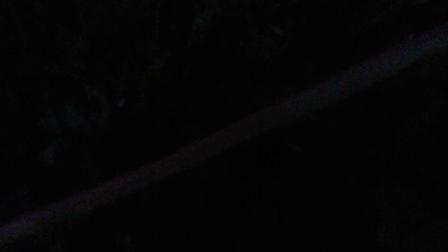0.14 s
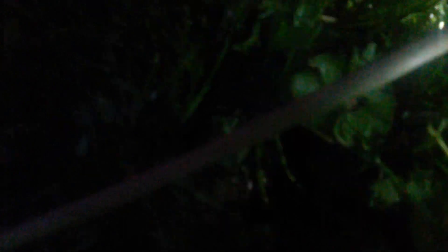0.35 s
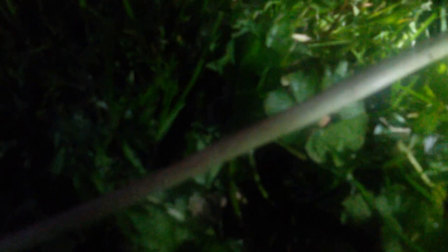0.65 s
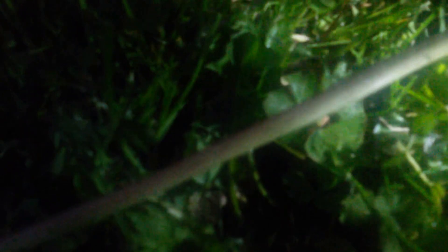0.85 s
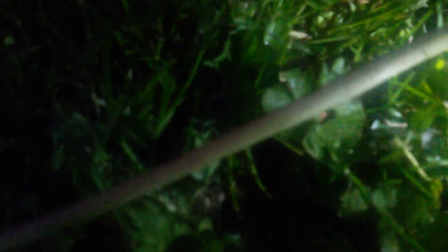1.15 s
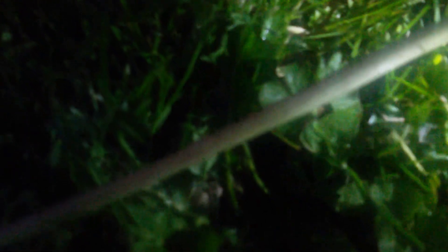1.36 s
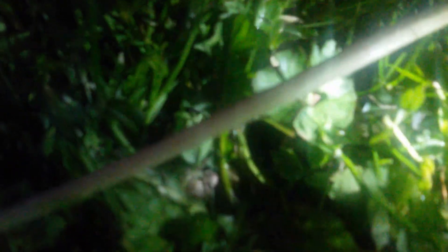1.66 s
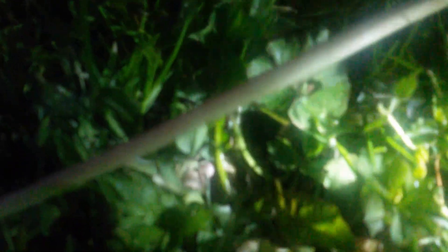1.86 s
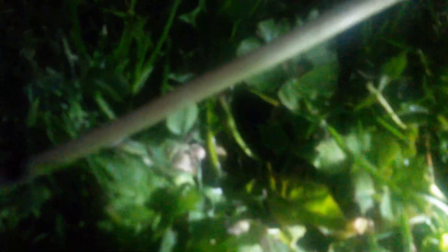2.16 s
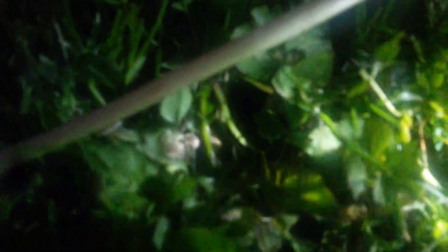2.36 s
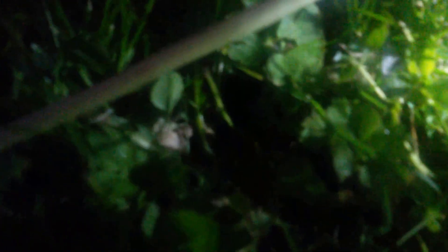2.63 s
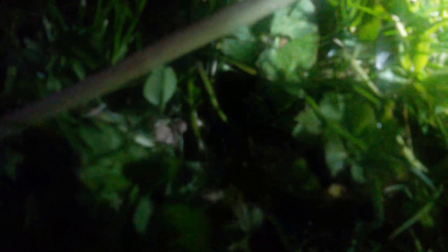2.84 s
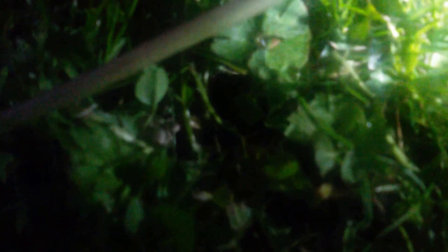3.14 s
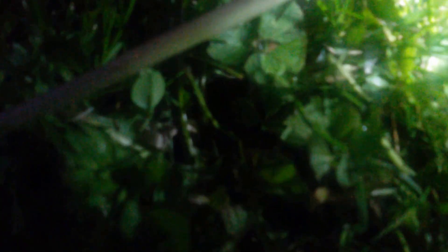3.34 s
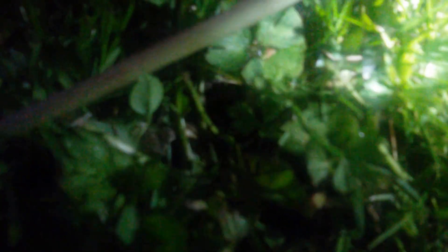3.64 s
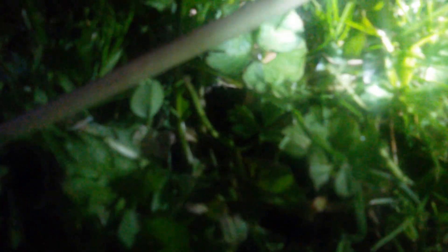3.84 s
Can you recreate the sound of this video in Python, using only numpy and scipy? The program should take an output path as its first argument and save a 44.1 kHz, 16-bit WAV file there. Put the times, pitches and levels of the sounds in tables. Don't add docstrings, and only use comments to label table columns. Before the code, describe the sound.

Faint night air and leaf hiss open the scene. At 0.33 seconds a mole cricket close by gives separate rough chirps, quickening into a loud, steady churr near 1.6 kHz, about 33 pulses a second, from 0.6. It slows around 2.7, pauses after 2.8, stutters again from 3.1 and trills from 3.4 to the end. Faint bush cricket zips near 11 kHz recur irregularly; pauses sound muffled.

```python
import sys
import numpy as np
from scipy import signal
from scipy.io import wavfile
from scipy.ndimage import uniform_filter1d, minimum_filter1d

SR = 44100
rng = np.random.default_rng(int(sys.argv[2]) if len(sys.argv) > 2 else 0)


def level_to_linear(level):
    exponent = np.asarray(level, float) / 20
    return 10 ** exponent


def transcribe(u):
    v = np.clip(np.atleast_2d(u).T, -1, 1)
    q = np.round(v * 32767).astype(np.int16)
    wavfile.write(sys.argv[1], SR, q)


N = 176400


def band(x, hz, width):
    return signal.lfilter(*signal.iirpeak(hz, hz / width, fs=SR), x)


def unit(x):
    return x / np.sqrt(np.mean(x ** 2))


def hiss(hz, width, count=N):
    return unit(band(rng.standard_normal(count), hz, width))


def walk(rate):
    k = int(SR / rate)
    steps = np.repeat(rng.standard_normal(N // k + 1), k)
    return unit(uniform_filter1d(uniform_filter1d(steps, k), k)[:N])


def night():
    # f/Hz, density/dB per Hz
    night_air = np.array([(30, -11), (90, -3.5), (250, -5.5), (600, -12.5), (2500, -14.5), (5200, -19),
                          (8500, -26.5), (14000, -14)])
    # t/s, level/dB
    rustle_levels = np.array([
        (0, -62.5),
        (.25, -65),
        (.5, -69),
        (1.0, -72),
        (1.5, -67),
        (2.2, -65.5),
        (2.5, -64.5),
        (2.8, -70),
        (3.3, -71.5),
        (3.7, -68.5),
    ])
    t = np.arange(N) / SR
    air = 0
    for hz in 35 * 2 ** np.arange(0, 8.8, .5):
        db = np.interp(np.log(hz), np.log(night_air[:, 0]), night_air[:, 1]) + 1.1 * walk(6)
        air = air + level_to_linear(db) * band(rng.standard_normal(N), hz, hz / 3)
    chorus = hiss(5100, 300) * level_to_linear(-69 + 2 * walk(5))
    opening = np.exp(-t / .3)
    opening_hiss = (hiss(4200, 6000) * level_to_linear(-55) + 1.8 * chorus) * opening
    rustle = hiss(13500, 2500) * level_to_linear(np.interp(t, *rustle_levels.T) + walk(7.2))
    return (unit(air) * level_to_linear(-52) + chorus) * level_to_linear(4 * opening) + rustle + opening_hiss


def strokes(keys, hz):
    beat_s, lone_s = .03, .1
    keys = np.array(keys)
    gaps = np.diff(keys[:, 0])
    place = np.r_[0, np.cumsum(np.where(gaps < lone_s, 1, np.round(gaps / beat_s)))]
    beat = np.arange(place[-1] + 1)
    columns = [np.interp(beat, place, column) for column in keys.T]
    rows = np.array(columns + [hz + 0 * beat]).T
    between = ~np.isin(beat, place)
    rows[between, :5] += rng.standard_normal((len(beat), 5))[between] * [.0003, .4, .2, .05, .03]
    return rows


def wing_stroke(row, rough, warm, chance, jump, stutter, ms):
    # multiple, level at the catch/dB, mid-stroke/dB, at the let-go/dB
    overtones = [(2, -18, -30, -36), (3, -25, -43, -31), (4, -36, -49, -47), (5, -35, -48, -52),
                 (6, -49, -58, -57)]
    attack_ms, release_ms, contact_ms, catch_ms = .63, .52, .3, 1.2
    sag_hz_per_ms, catch_hz, free_rise_hz = 5.2, 40, 170
    stumble_ms, stumble_hz, scatter_db = .4, 450, 2.8
    s, length, db, grip, end, hz = row
    jump_ms, depth = jump
    skip = depth * np.exp(-((ms - jump_ms) / stumble_ms) ** 2)

    force = [grip, .75 + grip / 3, .95 + end / 2 - grip / 3, end * 1.14, end * .88]
    push = uniform_filter1d(np.interp(ms / length, [0, .3, .55, .8, 1], force), size=61)
    push *= 1 + .15 * rough * stutter * np.exp(-ms / 4)
    push *= 1 - skip

    rise = 1 - np.exp(-(ms / attack_ms) ** 2)
    early = np.exp(-ms / catch_ms)
    late = min(length / 10, 1) ** 2 * np.exp(-((ms - length + 1) / 2.4) ** 2)

    pitch = hz + 4 * chance[0] - sag_hz_per_ms * (1 - .55 * warm) * ms
    pitch += catch_hz * early * (1 + .5 * chance[1] + 28 * max(.8 - grip, 0))
    pitch += stumble_hz * 2 * skip
    pitch += free_rise_hz / (1 + np.exp(length + 1.5 - ms))
    phase = 2 * np.pi * np.cumsum(pitch) / SR + np.pi

    contact = push * rise ** 1.5 / (1 + np.exp((ms - length - .3) / contact_ms))
    fade_ms = release_ms * np.sqrt(length / 40 + .75)
    ripple = 1 + .03 * chance[2] * np.sin(ms * 2.5)
    ring = push * rise * ripple / (1 + np.exp((ms - length - .25) / fade_ms)) ** .45
    wave = ring * np.sin(phase)
    lag = 1.2 * (1 - np.exp(-ms / 2.5))
    for j, (multiple, catch_db, mid_db, end_db) in enumerate(overtones):
        catch_db = catch_db - 2.5 * rough + scatter_db * chance[3 + j]
        end_db = end_db + scatter_db * chance[8 + j]
        if j == 0 and s > 3.0:
            catch_db -= 6
        if j == 1:
            mid_db = mid_db + 11 * warm + 1.5 * max(length - 12, 0) * (1 - warm)
            end_db -= 4.5 * warm
        mix = grip ** 2 * level_to_linear(catch_db) * early + level_to_linear(mid_db) + level_to_linear(end_db) * late
        mix *= level_to_linear(5 * warm * ((j == 1) - (j > 1)))
        wave += contact * mix * np.sin(round(multiple) * (phase + lag) + chance[j])

    burst = grip * np.exp(-ms / (.7 + 1.5 * rough)) + .12 * late
    burst *= level_to_linear(db + .26 * scatter_db * chance[13] + 1.5 * rough) * rng.standard_normal(len(ms))
    return level_to_linear(db) * wave, level_to_linear(db) * contact, burst


def mole_cricket():
    # t/s, length/ms, level/dB, grip at the start (0-1), strength near the end (0-1)
    warm_up_a = [
        (0.3303, 17.2, -12.1, 0.71, 0.82),
        (0.3935, 15.9, -13.2, 0.84, 0.81),
        (0.4311, 10.3, -14.4, 1.02, 0.74),
        (0.4599, 8.8, -17, 0.93, 0.75),
        (0.4895, 7.1, -16.6, 1.08, 0.64),
        (0.5181, 7.0, -17.1, 1.05, 0.74),
        (0.5461, 5.9, -15.3, 0.96, 0.6),
        (0.575, 7.0, -16.5, 0.73, 0.59),
    ]
    trill_a = [(0.6295, 12.5, -14.3, 0.95, 0.9), (0.6593, 12.6, -14.7, 0.93, 0.92),
               (0.689, 12.6, -14.9, 0.9, 0.93), (0.8092, 12.8, -15.2, 0.86, 0.95),
               (0.8405, 11.9, -14.9, 0.87, 0.92), (0.9644, 11.7, -15.5, 0.85, 0.95),
               (0.9948, 13.0, -16.6, 0.72, 1.03), (1.2121, 11.8, -14.4, 0.87, 0.84),
               (1.3945, 10.9, -14.1, 0.9, 0.86), (1.5411, 10.7, -14.7, 0.87, 0.87),
               (1.7174, 11.3, -14.5, 0.79, 0.85), (1.7478, 10.2, -14.2, 0.9, 0.79),
               (2.0402, 10.0, -14.1, 0.89, 0.81), (2.1577, 8.9, -13.8, 0.85, 0.77),
               (2.2728, 11.4, -14.3, 0.87, 0.83), (2.4171, 8.5, -14.0, 0.96, 0.81),
               (2.5317, 11.5, -14.7, 0.91, 0.95), (2.5614, 12.7, -14.5, 0.91, 0.92),
               (2.593, 12.8, -14.7, 0.85, 0.93), (2.6246, 14.1, -14.6, 1.01, 0.86),
               (2.6584, 16.3, -15.8, 0.68, 0.99), (2.6962, 17.1, -16.5, 0.51, 0.96),
               (2.7486, 16.8, -16.8, 0.48, 1.08), (2.8022, 19.6, -15.5, 0.36, 0.99)]
    warm_up_b = [
        (3.1009, 19.1, -13.2, 0.47, 0.91),
        (3.1912, 17.9, -13.6, 0.52, 0.96),
        (3.2271, 13.2, -13.0, 0.97, 0.68),
        (3.2635, 12.4, -14.2, 1.0, 0.72),
        (3.2975, 8.4, -16.1, 0.8, 0.78),
        (3.3273, 7.6, -16.6, 0.75, 0.67),
        (3.3569, 7.2, -16.6, 0.75, 0.59),
    ]
    trill_b = [(3.4116, 12.2, -14.2, 1.03, 0.85), (3.4417, 11.2, -14.2, 1.02, 0.86),
               (3.471, 11.6, -14.4, 1.0, 0.88), (3.5, 12.9, -15.6, 0.84, 0.95),
               (3.529, 13.9, -15.3, 0.78, 1.0), (3.5595, 13.9, -14.9, 0.78, 0.98),
               (3.5903, 13.4, -14.7, 0.76, 0.97), (3.6208, 12.6, -14.5, 0.82, 0.95),
               (3.6512, 12.2, -14.5, 0.86, 0.9), (3.6824, 10.4, -14.1, 0.89, 0.85),
               (3.7125, 9.3, -13.9, 0.89, 0.83), (3.7427, 7.9, -13.8, 1.02, 0.79),
               (3.7701, 10.4, -14.6, 0.55, 0.87), (3.8005, 9.9, -14.4, 0.9, 0.88),
               (3.8294, 10.7, -14.8, 0.88, 0.9), (3.8597, 10.8, -14.4, 0.9, 0.9),
               (3.8892, 11.2, -14.8, 0.88, 0.9), (3.9194, 11.8, -15.0, 0.8, 0.92),
               (3.9487, 12.3, -15.1, 0.83, 0.92), (3.9795, 10.6, -14.9, 0.78, 0.9)]
    retry = [
        (1.5488, 1.2, -15.5, 1.0, 0.8),
    ]
    # t/s, length/ms, level change/dB
    slips = [
        (0.934, 5.1, -2),
        (0.964, 6.4, -1.6),
        (1.027, 6.4, -0.3),
        (1.541, 2.6, -1.4),
        (2.332, 2.4, -0.8),
        (3.8, 4.2, -3.5),
        (3.86, 5.2, -0.7),
    ]
    # t/s, time into the stroke/ms, depth (0-1)
    stumbles = [
        (.3935, 5.5, .3),
        (.4895, 1.9, .4),
        (.5461, 2.0, .4),
        (.575, 2.0, .6),
        (1.5706, 2.8, .35),
        (3.2975, 2.0, .35),
        (3.3272, 2.0, .85),
        (3.3568, 1.9, .65),
        (3.8004, 2.2, .5),
    ]
    # f/Hz, width/Hz, level/dB
    body = [(942, 110, 2), (1460, 1120, -3.5), (2050, 3000, -9.5), (3760, 320, -11), (5050, 360, -11),
            (6700, 270, -34.5)]
    warm_up_hz, trill_hz = 1569.5, 1639
    rows = np.vstack([strokes(warm_up_a, warm_up_hz), strokes(trill_a, trill_hz),
                      strokes(warm_up_b, warm_up_hz), strokes(trill_b, trill_hz), strokes(retry, trill_hz)])
    warm = 1. * (rows[:, 5] == warm_up_hz)
    rough = np.clip((.8 - rows[:, 4]) * 5, 0, 1) * warm
    for s, length, db in slips:
        k = np.argmin(abs(rows[:, 0] - s))
        rows[k, :3] = s, length, rows[k, 2] + db
        rough[k] = np.clip(.4 - db / 4, 0, 1.5)
    jumps = np.zeros((len(rows), 2))
    for s, when, depth in stumbles:
        jumps[np.argmin(abs(rows[:, 0] - s))] = when, depth

    size = int(.035 * SR)
    total = N + size
    ms = np.arange(size) / SR * 1000
    song, touch, catch = np.zeros((3, total))
    chance = rng.standard_normal((len(rows), 16))
    stutter = hiss(331.5, 267, total)
    for row, r, w, c, jump in zip(rows, rough, warm, chance, jumps):
        i = int((row[0] - .0005) * SR)
        here = slice(i, i + size)
        wave, contact, burst = wing_stroke(row, r, w, c, jump, stutter[here], ms)
        song[here] += wave
        touch[here] += contact
        catch[here] += burst

    knock = sum(level_to_linear(db - 2) * band(band(catch, hz, width), hz, width) for hz, width, db in body)
    wash = uniform_filter1d(touch, size=1500, origin=500)
    scrape = (level_to_linear(-43.5) * touch + level_to_linear(-32.5) * wash) * hiss(2000, 4200, total)
    hum = unit(band(hiss(950, 410, total), 950, 410))
    wings = unit(band(hiss(1550, 1100, total), 1550, 1100))
    flicker_db = 2.5 * walk(150)[np.arange(total) % N]
    haze = wash * (level_to_linear(-42.5) * hum + level_to_linear(-32.5 + flicker_db) * wings)
    return (song + knock + haze + scrape)[:N]


def burrow_horn(x):
    x = signal.sosfilt(signal.butter(2, [720, 9000], "band", fs=SR, output="sos"), x)
    return x - .6 * band(x, 2600, 350)


def undergrowth(x):
    t60_s, echo_db = .07, -38
    t = np.arange(int(t60_s * SR)) / SR
    tail = rng.standard_normal(len(t)) * 1000. ** (-t / t60_s) * (t > .004)
    return level_to_linear(echo_db) * signal.fftconvolve(x, tail / np.sqrt(np.sum(tail ** 2)))[:N]


def bush_cricket():
    # t/s, length/s, level/dB
    zips = [(.36, .1, -57), (.69, .097, -60), (.96, .1, -60), (1.22, .095, -58), (1.4, .064, -64),
            (1.515, .095, -60), (1.69, .102, -57), (2.115, .125, -59), (2.37, .06, -67), (2.47, .11, -59),
            (2.87, .08, -63), (3.22, .07, -58), (3.483, .092, -59), (3.715, .11, -60)]
    wing_hz, width_hz, teeth_per_s = 10750, 800, 1200
    t = np.arange(N) / SR
    teeth = (rng.random(N) < teeth_per_s / SR) * rng.standard_normal(N)
    teeth += .1 * rng.standard_normal(N)
    wing = 0
    for offset, sign in ((-350, -1), (350, 1)):
        hz = wing_hz + offset
        mode = unit(band(band(teeth, hz, width_hz), hz, width_hz))
        wing = wing + sign * mode * level_to_linear(1.5 * walk(40))
    swell = sum(level_to_linear(db) * np.sin(np.pi * np.clip((t - s) / length, 0, 1)) for s, length, db in zips)
    return level_to_linear(1.5) * unit(wing) * swell


def thin_treble(x):
    hz, _, z = signal.stft(x, SR, nperseg=2048, noverlap=1024)
    loud = uniform_filter1d(np.sqrt(np.mean(abs(z) ** 2, axis=0)), size=3, origin=1)
    usual = np.median(abs(z), axis=1) * np.interp(hz, [6800, 8800], [0, 1])
    follow = np.minimum(loud / np.median(loud), 1) ** .6
    edge = level_to_linear(5.6) * np.outer(uniform_filter1d(usual, size=40), follow)
    return signal.istft(z * (abs(z) > edge), SR, nperseg=2048, noverlap=1024)[1][None, :N]


def noise_gate(x):
    gate_db, start_db, recover_s, fall_s, hold_s = -13.5, -13, .09, .055, .026
    hold = int(hold_s * SR) // 2
    quiet = minimum_filter1d(1. * (abs(x) < .05), size=2 * hold + 1, origin=hold)
    keeps = np.exp(-1 / (np.array([recover_s, fall_s]) * SR))
    slow, fast = [signal.lfilter([1 - k], [1, -k], gate_db * quiet, zi=[start_db])[0] for k in keeps]
    return np.minimum(slow, fast)


def scene():
    singer = burrow_horn(mole_cricket())
    return (night() + singer + undergrowth(singer) + bush_cricket())[None]


def top_cut(x):
    return signal.sosfilt(signal.butter(12, 15430, fs=SR, output="sos"), x)


def record(dry):
    gated = thin_treble(dry[0]) * level_to_linear(noise_gate(dry[0]))
    mix = signal.sosfilt(signal.ellip(8, .2, 60, 14450, fs=SR, output="sos"), gated)
    return top_cut(mix)


dry = scene()
out = record(dry)
transcribe(out)
```